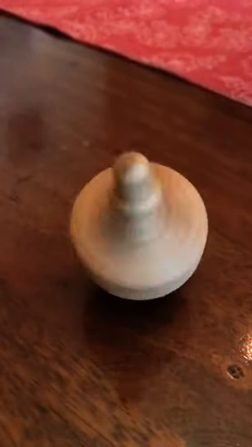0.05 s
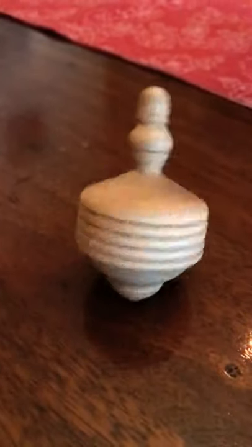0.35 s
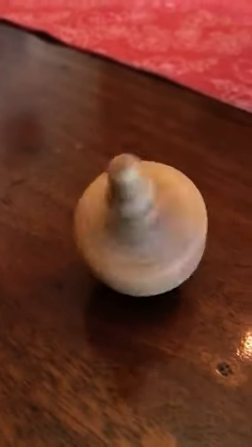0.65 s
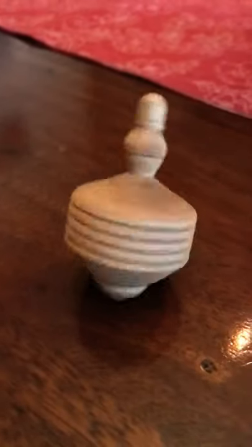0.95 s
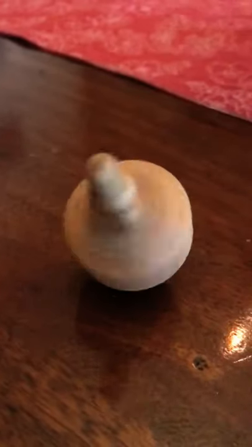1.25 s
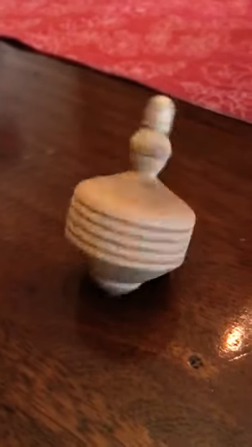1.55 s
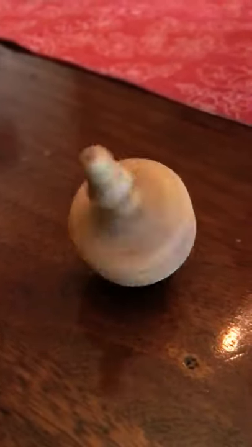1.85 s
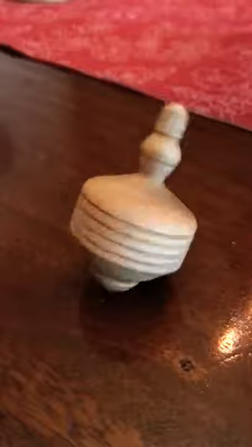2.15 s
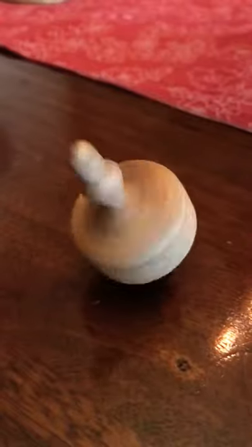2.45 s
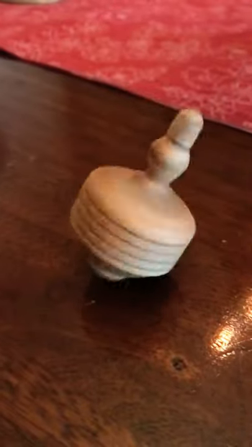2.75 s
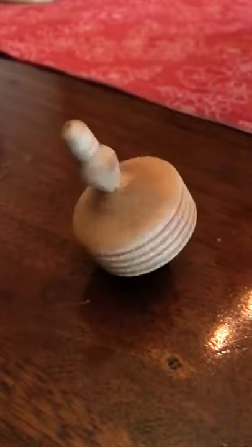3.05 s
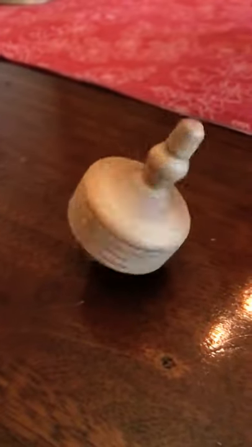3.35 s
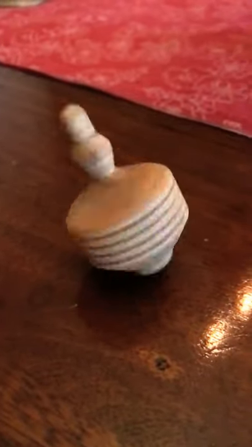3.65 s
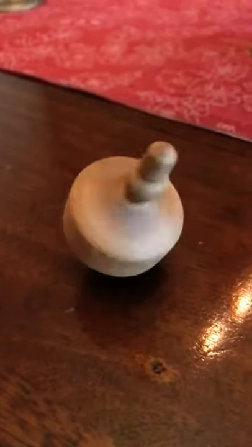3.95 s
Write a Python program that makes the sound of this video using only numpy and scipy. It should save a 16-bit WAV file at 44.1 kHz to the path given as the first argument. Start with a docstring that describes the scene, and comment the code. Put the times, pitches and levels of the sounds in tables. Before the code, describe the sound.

A small wooden top spins on a wooden table for the whole four seconds, with a hollow rumble and hum under a rapid pulse of soft scrapes and thuds that slows slightly. Light, irregular knocks ring the tabletop, clearest near 0.7 seconds, from 1.6 to 2.3, and around 2.9. It is still spinning at the end. The room is quiet, with faint hiss and a barely audible electrical whine.

```python
"""A rumble with a quick pulse of scrapes and thuds: a small wooden top spins and wobbles on a polished
wooden table, slowly losing speed. Its uneven tip repeats every turn, so the tabletop rumbles and hums.
Once a turn it thuds and a rough spot scrapes; now and then it catches with a knock that rings the table.
The room is quiet, with a faint hiss and a thin electrical whine."""
import sys
import numpy as np
from scipy import signal
from scipy.fft import rfft, irfft, next_fast_len
from scipy.io import wavfile
from scipy.ndimage import uniform_filter1d, map_coordinates

SR = 44100
rng = np.random.default_rng(int(sys.argv[2]) if len(sys.argv) > 2 else 0)


def dump_mix(stems):
    """Bounce the given channels to the path in sys.argv[1] as a 16-bit WAV at rate SR."""
    frames = np.atleast_2d(stems).T  # one column per channel
    limited = np.clip(frames, -1, 1)  # hard clip at full scale
    pcm = np.round(limited * 32767).astype(np.int16)
    wavfile.write(sys.argv[1], SR, pcm)


N = 176400
TIME_S = np.arange(N) / SR
SPIN_HZ, SLOWING_HZ_PER_S, FIRST_SCRAPE_S = 19.134, 0.713, 0.013

# Rolling rumble: time_s, relative_db
RUMBLE_LEVELS = [(0.0, -48), (0.56, -51), (0.72, -47.5), (0.99, -48), (1.95, -45.5), (2.64, -47.5),
                 (2.99, -46.5), (3.4, -48), (3.49, -44.5), (3.72, -49.5), (3.92, -45.5), (4.0, -50.5)]
# Once-a-turn scrape: time_s, relative_db
SCRAPE_LEVELS = [(0, -50), (.27, -49), (.34, -44.5), (.65, -51), (.85, -44), (1.0, -47), (1.2, -43.5),
                 (1.48, -50), (1.6, -43.5), (2.4, -45.5), (2.62, -48), (2.75, -42), (3.05, -44.5),
                 (3.38, -49.5), (3.49, -45), (3.72, -49.5), (3.87, -44)]
# Once-a-turn thud: time_s, relative_db, pitch_hz
THUD_TRACK = [(0, -34, 375), (.27, -37, 388), (.33, -32.5, 374), (.53, -33, 377), (.6, -33.5, 392),
              (.9, -33, 377), (1.0, -44, 373), (1.15, -33, 405), (1.3, -35.5, 447), (1.5, -40.5, 414),
              (1.58, -31, 402), (1.95, -32.5, 390), (2.25, -37, 428), (2.6, -42, 384), (2.82, -32.5, 360),
              (3.04, -32, 339), (3.3, -39.5, 340), (3.48, -35.5, 339), (3.7, -42, 350), (3.95, -34, 340)]
# Catches of the tip: start_s, relative_ring_db, relative_tick_db
CATCHES = [(.015, -53, -67), (.119, -51, -56), (.329, -50.5, -62), (.437, -49, -70), (.489, -52.5, -70),
           (.539, -61, -60), (.592, -42.5, -51), (.699, -40.5, -49), (.809, -48.5, -58), (.862, -50, -55),
           (.919, -54, -63), (1.077, -49, -53), (1.132, -42.5, -50), (1.247, -45, -58), (1.301, -44, -54),
           (1.579, -47, -69), (1.632, -42, -50), (1.688, -46, -49), (1.742, -40.5, -48), (1.799, -45, -61),
           (1.853, -40.5, -48.5), (1.962, -47.5, -63), (2.079, -47.5, -65), (2.135, -42, -66),
           (2.25, -37.5, -45.5), (2.307, -45, -50), (2.354, -55, -62), (2.422, -50, -51),
           (2.764, -50.5, -63), (2.828, -37.5, -45.5), (2.945, -35, -48), (2.954, -45, -52),
           (3.003, -45.5, -52), (3.062, -56, -59), (3.178, -40, -51), (3.305, -48, -62), (3.478, -45, -54),
           (3.836, -52, -59), (3.854, -45.5, -60), (3.967, -52, -66)]
# Rings of bumps on the tip: bumps_per_turn, middle_s, half_length_s, level_db
BUMP_RINGS = [(10, 0.43, 0.53, -53.5), (14, 0.13, .25, -56), (35, 1.146, 0.057, -54),
              (12, 1.44, 0.41, -55.5), (25, 1.3, 0.29, -59.5), (13, 1.74, 0.6, -56), (15, 1.92, .26, -52),
              (18, 2.62, 0.45, -53), (13, 2.92, 0.19, -53), (16, 3.46, 0.16, -56), (19, 3.65, 0.27, -54.5),
              (22, 3.92, 0.14, -51), (3, 2.0, 0.95, -70.5), (5, 1.95, .5, -66), (6, .2, 0.88, -69.5),
              (6, 3.41, 0.74, -66)]
# Tabletop resonances: centre_hz, width_hz, gain_db
TABLE_MODES = [(54.1, 14, -8), (157, 7.5, -20), (191.2, 5.8, -10.5), (224.9, 30, 1), (267, 7, 4.5),
               (300.9, 13.6, 6.5), (358.3, 21.2, 3), (404.8, 13, 1.5), (440, 16, 0), (512.3, 9, 1),
               (614, 22, 0), (680.3, 20, 0.5), (736, 22, -6), (947.5, 11, -0.5), (1230, 48, -8)]
# Rolling force: frequency_hz, gain_db
ROLL_SPECTRUM = [(35, -20), (60, -7), (200, -2.5), (400, -2), (700, -7.5), (1300, -17.5), (2000, -19),
                 (5000, -42)]
# Scraping force: frequency_hz, gain_db
SCRAPE_SPECTRUM = [(100, -29), (220, -16.5), (380, -0.5), (700, -0.5), (1300, -10), (1650, -16.5),
                   (2000, -30), (3000, -27.5), (5000, -50), (9000, -48)]
# Dense upper ring of the table: frequency_hz, gain_db
RING_SPECTRUM = [(200, -18.5), (500, 2), (700, 5.5), (950, 0.5), (1250, 1), (1600, -10.5), (1900, -22.5),
                 (3000, -34.5), (5000, -50), (9000, -70)]
# Tick and grit of a slip: frequency_hz, gain_db
TICK_SPECTRUM = [(300, -5), (700, 10), (1500, 10), (2200, 3), (2800, 4.5), (4000, -6.5), (5500, -9),
                 (7000, -26), (15000, -48)]
# Background hiss: frequency_hz, gain_db
HISS_SPECTRUM = [(25, 6), (38, -10), (60, 26.5), (200, 20), (1000, 5.5), (2500, 4), (4000, 0.5), (6500, -1),
                 (7700, -5), (9200, -2), (10400, -7.5), (11500, -3), (15500, -5)]
# Overtones of the electrical whine: frequency_hz, level_db
WHINE_SPECTRUM = [(2000, -95.5), (3000, -88.5), (7000, -91.5), (10000, -95.5), (15000, -99)]


def rolling(gain_db=-0.5):
    """The uneven tip rolls and shakes the tabletop."""
    force = coloured(tip_texture(drift_rad=0.075, fine_drift_rad=0.0359), ROLL_SPECTRUM)
    return amp(curve(RUMBLE_LEVELS) + gain_db) * unit_rms(tabletop(force))


def thudding(gain_db=-3, decay_s=0.0049, slip_rad=0.8):
    """Once a turn the tip bears down with a few cycles of a hollow tone."""
    turn = turns()
    times_s, levels_db, pitches_hz = np.transpose(THUD_TRACK)
    beats_s = np.interp(np.arange(int(turn[-1]) + 1), turn, TIME_S)
    out = np.zeros(N + SR)
    for beat_s, slip in zip(beats_s, rng.standard_normal(len(beats_s))):
        span = int(beat_s * SR) + np.arange(-SR // 20, SR // 20)
        offset_s = span / SR - beat_s
        swell = np.exp(-np.abs(offset_s / decay_s) ** 1.1)
        pitch_hz = np.interp(beat_s, times_s, pitches_hz)
        tone = np.cos(2 * np.pi * pitch_hz * offset_s + slip_rad * unsteadiness(beat_s) * slip)
        out[span] += amp(np.interp(beat_s, times_s, levels_db) + gain_db) * swell * tone
    return out[:N]


def scraping(gain_db=-2.5, waver_db=2, grain_db=2.5, rise_turns=0.18, fall_turns=0.15):
    """The rough spot swells and fades once a turn, a little early or late as the top wobbles."""
    wander_turns = 0.037 * unsteadiness(TIME_S) * wobble(25)
    offset_turns = (turns() + wander_turns + 0.5) % 1 - 0.5
    width_turns = np.where(offset_turns < 0, rise_turns, fall_turns) * (1 + 0.21 * TIME_S)
    swell = np.exp(-np.abs(offset_turns / width_turns) ** 1.22)
    strength = amp(curve(SCRAPE_LEVELS) + gain_db + waver_db * wobble(18))
    grain = unit_rms(amp(grain_db * wobble(220)))
    force = coloured(tip_texture(drift_rad=0.598, fine_drift_rad=0.01216), SCRAPE_SPECTRUM)
    return strength * grain * swell * force


def knocking(ring_gain_db=-0.5, tick_gain_db=18, grit_gain_db=-12, lead_s=0.006, decay_s=0.0097):
    """The tip slips with a gritty tick and rings the table, a little differently at each spot."""
    ring, tick, grit = np.zeros((3, N + SR))
    for start_s, ring_db, tick_db in CATCHES:
        start, wave = int(start_s * SR), edge_echoes()
        ring[start:start + len(wave)] += amp(ring_db + ring_gain_db) * wave
        tick[start] = amp(tick_db + tick_gain_db)
        span = np.arange(start - SR // 20, start + SR // 20)
        swell = np.exp(-np.abs(span / SR - start_s + lead_s) / decay_s)
        grit[span] += amp(tick_db + grit_gain_db) * swell
    grains = unit_rms(amp(6 * wobble(700))) * coloured(rng.standard_normal(N), TICK_SPECTRUM)
    ticks = filtered(tick[:N], lambda hz: gain_at(TICK_SPECTRUM, hz))
    return ring[:N] + ticks + grit[:N] * grains


def humming(waver_db=2, slip_rad=0.33):
    """The lean brings rings of even bumps onto the table; each hums at a multiple of the spin rate."""
    turn, out = turns(), np.zeros(N)
    for bumps, middle_s, half_length_s, level_db in BUMP_RINGS:
        strength = amp(level_db + waver_db * wobble(9))
        swell = np.exp(-np.abs((TIME_S - middle_s) / half_length_s) ** 5 / 2)
        phase_rad = 2 * np.pi * (bumps * turn + rng.random())
        phase_rad += slip_rad * unsteadiness(TIME_S) * wobble(14)
        out += strength * swell * np.sqrt(2) * np.sin(phase_rad)
    return out


def turns():
    """Turn count at each sample; friction slows the spin evenly."""
    return SPIN_HZ * (TIME_S - FIRST_SCRAPE_S) - SLOWING_HZ_PER_S * TIME_S ** 2 / 2


def unsteadiness(time_s):
    """The slower the top, the less one turn is like the last."""
    return 0.61 + 0.34 * time_s


def tip_texture(drift_rad, fine_drift_rad, size=2048):
    """Bumps around the tip pass once a turn; they change as the lean shifts, the fine ones fastest."""
    turn = turns() + 1
    orders = np.arange(size // 2 + 1)
    step_rad = drift_rad + fine_drift_rad * orders
    steps_rad = step_rad * rng.standard_normal((int(turn[-1]) + 2, len(orders)))
    phases_rad = rng.uniform(0, 2 * np.pi, len(orders)) + np.cumsum(steps_rad, axis=0)
    profiles = irfft(np.exp(1j * phases_rad), size)  # one row per turn
    wrapped = np.hstack([profiles, profiles[:, :1]])
    return unit_rms(map_coordinates(wrapped, [turn, turn % 1 * size], order=1))


def tabletop(force, groups=3, waver_db=2):
    """The table's resonances answer a force, swelling and fading as the top drifts over it."""
    out = np.zeros(N)
    for group in range(groups):
        def response(hz):
            return sum(amp(db) * 1j * hz * width_hz / (centre_hz ** 2 - hz ** 2 + 1j * hz * width_hz)
                       for centre_hz, width_hz, db in TABLE_MODES[group::groups])
        out += amp(waver_db * wobble(4.04)) * filtered(force, response)
    return out


def edge_echoes(count=18, size=4096, first_s=0.00031, spread_s=0.021, loss_db_per_s=556):
    """Bending waves return from the table's edges, highs first; loudest rms is 1."""
    hz = np.fft.rfftfreq(size, 1 / SR)
    travel_s = first_s + spread_s * (np.arange(count) + rng.random(count))[:, None] / count  # at 1 kHz
    phase_rad = 4 * np.pi * travel_s * np.sqrt(1000 * hz) + 2 * np.pi * rng.random((count, 1))
    paths = amp(-loss_db_per_s * travel_s) * np.exp(-1j * phase_rad)
    wave = irfft(paths.sum(0) * gain_at(RING_SPECTRUM, hz), size)
    i = np.arange(size)
    wave *= np.sin(np.pi / 2 * np.minimum(i / 40, 1)) ** 2  # fade in
    wave *= np.cos(np.pi / 2 * i / size) ** 2  # fade out
    return wave / np.sqrt(uniform_filter1d(wave ** 2, size=320).max())


def room(x, t60_s=0.5, wet_db=-13):
    """The walls add a short, weak tail."""
    t = np.arange(SR // 2) / SR
    tail = rng.standard_normal(len(t)) * amp(-60 * t / t60_s) * (t > 0.005)
    return x + amp(wet_db) * signal.fftconvolve(x, tail / np.linalg.norm(tail))[:N]


def background(hiss_db=-67.5, whine_hz=1013.7):
    """Steady hiss and the overtones of a faint electrical whine."""
    whine = sum(gain_at(WHINE_SPECTRUM, hz) * np.sqrt(2) * np.sin(2 * np.pi * (hz * TIME_S + rng.random()))
                for hz in whine_hz * np.arange(2, 16))
    return amp(hiss_db) * coloured(rng.standard_normal(N), HISS_SPECTRUM) + whine


def amp(db):
    """Decibels to gain."""
    return 10 ** (np.asarray(db) / 20)


def unit_rms(x):
    """Scale to rms 1."""
    return x / np.sqrt(np.mean(x ** 2) + 1e-20)


def gain_at(spectrum, hz):
    """Linear gain from (hz, db) rows, on a log frequency axis."""
    knots_hz, knots_db = np.transpose(spectrum)
    return amp(np.interp(np.log(hz + 1), np.log(knots_hz + 1), knots_db))


def curve(rows):
    """One value per sample from (time_s, value) rows."""
    return np.interp(TIME_S, *np.transpose(rows))


def wobble(knots_per_s):
    """Smooth random curve."""
    knots = rng.standard_normal(int(N * knots_per_s / SR) + 4)
    return map_coordinates(knots, [TIME_S * knots_per_s])


def filtered(x, response):
    """Apply a complex frequency response."""
    size = next_fast_len(N + SR // 2)
    return irfft(rfft(x, size) * response(np.fft.rfftfreq(size, 1 / SR)), size)[:N]


def coloured(x, spectrum):
    """Shape by (hz, db) rows, to rms 1."""
    return unit_rms(filtered(x, lambda hz: gain_at(spectrum, hz)))


def scene(direct_db=-2, table_db=-4):
    """Scrapes and knocks sound directly and through the tabletop, over thuds, rumble and hums."""
    contact = scraping() + knocking()
    rattle = room(thudding() + amp(direct_db) * contact + amp(table_db) * tabletop(contact))
    return (rolling() + humming() + rattle + background())[None]


def record(dry, cutoff_hz=15700):
    """Brick-wall low-pass."""
    return filtered(dry[0], lambda hz: hz < cutoff_hz)[None]


dry = scene()
out = record(dry)
dump_mix(out)
```